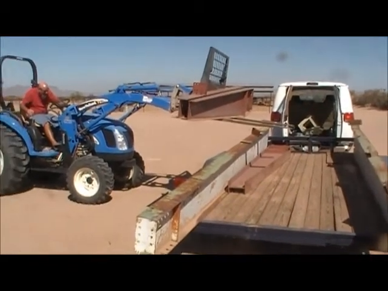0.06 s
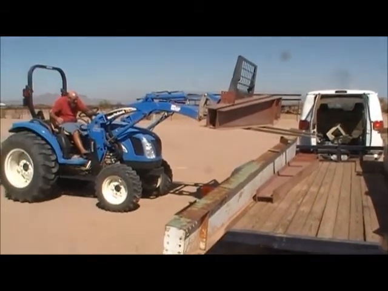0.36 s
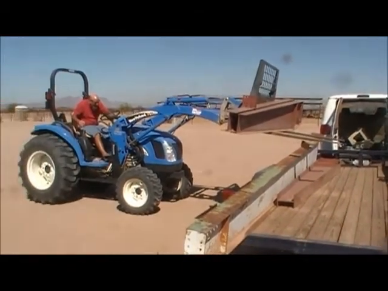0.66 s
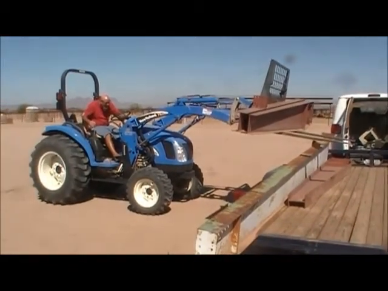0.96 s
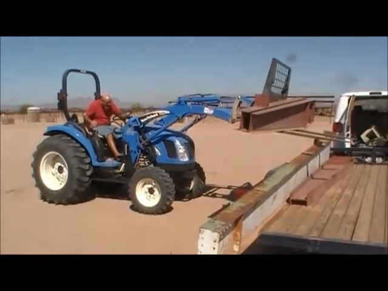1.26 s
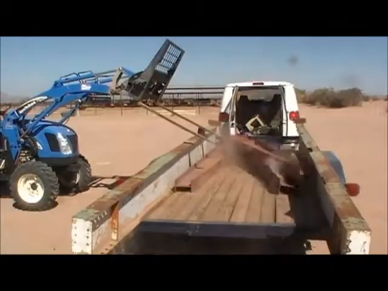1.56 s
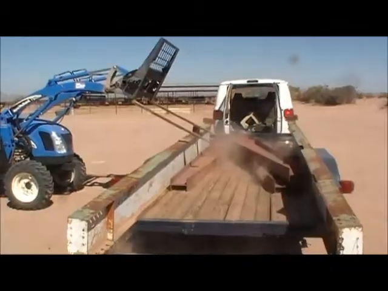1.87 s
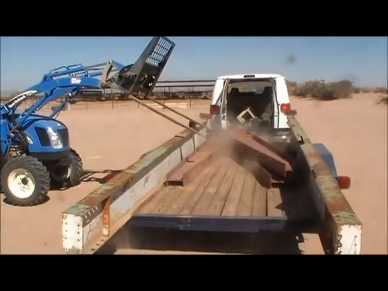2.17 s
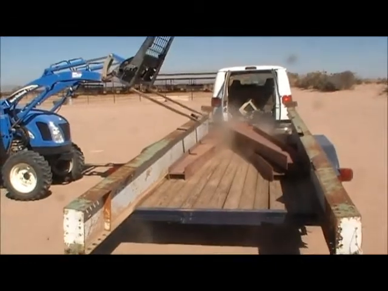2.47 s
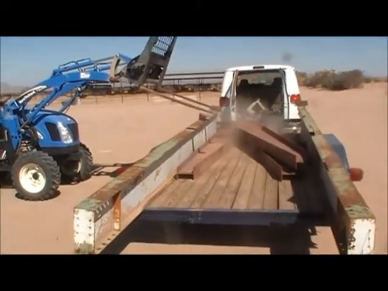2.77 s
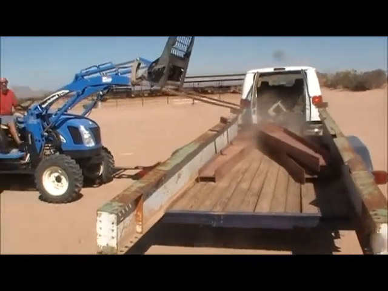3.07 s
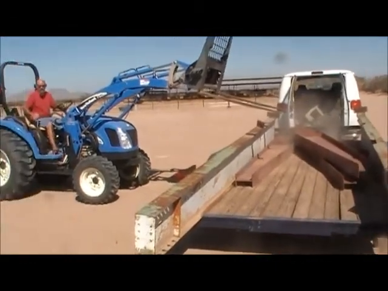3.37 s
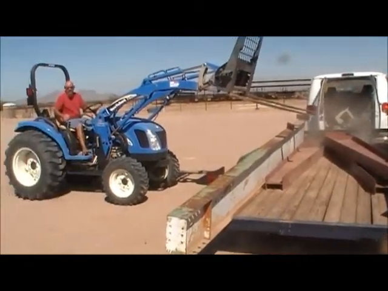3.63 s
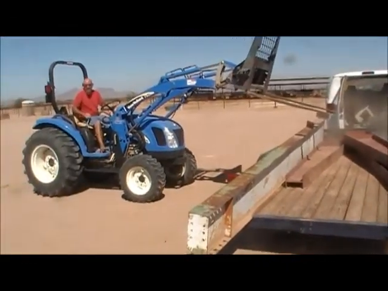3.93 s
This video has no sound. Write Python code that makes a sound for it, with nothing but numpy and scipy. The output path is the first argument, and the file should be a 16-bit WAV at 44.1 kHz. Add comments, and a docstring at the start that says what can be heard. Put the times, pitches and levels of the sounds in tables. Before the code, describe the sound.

A loud, slightly distorted crash of steel beams landing on a trailer's planks interrupts a tractor's clattering diesel idle outdoors. Bright rattles follow, the engine dips and comes back, and one sharp knock sounds. Faint wind touches the microphone early.

```python
"""Steel beams crash off a tractor's loader onto a trailer deck, heard in stereo on open ground.
Each blow rings the beams, clangs on steel and crunches on the planks; loose steel rattles after, and
the tractor gives one sharp, ringing knock. Its four-cylinder diesel idles throughout, swelling and
then falling away, puffing through the pipe and knocking block and bonnet. Light wind rumbles on the
microphone. The crash overloads the recorder, whose gain control ducks and slowly comes back."""
import sys
import numpy as np
from scipy import signal
from scipy.fft import rfft, irfft
from scipy.io import wavfile
from scipy.ndimage import uniform_filter1d

SR = 44100
rng = np.random.default_rng(int(sys.argv[2]) if len(sys.argv) > 2 else 0)


def to_wav(sig):
    """Store sig (one row per channel, or 1-D mono) as 16-bit WAV at the path in sys.argv[1].

    Samples outside -1..1 are clipped; the rate is SR.
    """
    pcm = np.clip(np.atleast_2d(sig), -1, 1) * 32767
    pcm = np.round(pcm).astype(np.int16)
    wavfile.write(sys.argv[1], SR, pcm.T)  # frames by channels


N = 176400

# Where the trailer sits in the stereo picture.
# Each row: frequency in Hz, left minus right in dB, left lead in radians, diffuse share in dB.
TRAILER_AT_MIC = [(80, -2, 0.18, 14), (400, -5, 0.19, -21), (1220, -5.5, 0.26, -11.5),
                  (2230, -2, 0.92, -7.5), (4400, -3, 0.37, -6.5), (12000, -1.2, .2, -3)]


def undb(db):
    """Decibels to gain."""
    return 10 ** (np.asarray(db) / 20)


def level(x, db):
    """Scale to an rms level."""
    return x * undb(db) / np.sqrt(np.mean(x ** 2))


def unit(x):
    """Scale each row to unit energy."""
    return x / np.sqrt(np.sum(x ** 2, axis=-1, keepdims=True) + 1e-18)


def curve(rows):
    """Join (s, value) points by straight lines."""
    return np.interp(np.arange(N) / SR, *np.array(rows).T)


def across(rows, axis=1):
    """One column of a frequency table at every spectral bin."""
    rows = np.array(rows)
    return np.interp(np.log(np.arange(N // 2 + 1) * SR / N + 1), np.log(rows[:, 0]), rows[:, axis])


def colour(x, rows):
    """Minimum-phase filter with the given (Hz, dB) response."""
    cepstrum = irfft(np.log(undb(across(rows))), N)
    cepstrum[1:N // 2] *= 2
    cepstrum[N // 2:] = 0
    taps = irfft(np.exp(rfft(cepstrum)), N)[:4096]
    return signal.fftconvolve(x, taps[None], axes=1)[:, :N]


def resonate(x, rows):
    """Sum of (Hz, width Hz, dB) resonances, alternating in sign."""
    return sum((-1) ** k * undb(db) * signal.lfilter(*signal.iirpeak(hz, hz / width, fs=SR), x)
               for k, (hz, width, db) in enumerate(rows))


def keep_energy(shaper, x, rows):
    """Filter x, scaled so that white noise would keep its energy."""
    return shaper(x, rows) / np.sqrt(np.sum(shaper(np.eye(1, N), rows) ** 2))


def fade(t60, start=0):
    """Exponential decay from a start time."""
    age = np.arange(N) / SR - start
    return (age >= 0) * np.exp(-np.log(1000) * np.maximum(age, 0) / t60)


def noise():
    """Two unrelated noises, usually for the direct and the diffuse sound."""
    return rng.standard_normal((2, N))


def play(pulses, shape):
    """Start the shape at every pulse."""
    return signal.fftconvolve(np.atleast_2d(pulses), np.atleast_2d(shape), axes=1)[:, :N]


def microphone(pair, rows):
    """Direct and diffuse sound reach the left and right ports with different level and phase."""
    direct, diffuse = rfft(pair)
    side, share = np.array([[1], [-1]]), undb(across(rows, axis=3))
    placement = undb(side * across(rows, axis=1) / 2) * np.exp(.5j * side * across(rows, axis=2))
    return irfft(placement * (direct + side * share * diffuse) / np.sqrt(1 + share ** 2), N)


def wind():
    """Light wind buffets the microphone, mostly in opposite phase at its two ports."""
    # The rumble. Each row: frequency in Hz, spectral level in dB.
    spectrum = [(20, -64), (50, -19), (90, -5), (220, 1), (300, -3.5), (450, -13), (900, -30), (16000, -75)]
    # The breeze dying down. Each row: time in seconds, level in dB.
    breeze = [(0, -24.5), (.25, -18), (.5, -25.5), (1, -29), (1.5, -34), (2.2, -41), (4, -88)]
    flutter_db = 2 * np.interp(np.arange(N), np.linspace(0, N, 60), rng.standard_normal(60))
    common, opposed = level(colour(noise(), spectrum), 0) * undb(curve(breeze) + flutter_db)
    return undb(-11) * common + np.array([opposed, -opposed])


def firings(crank, cylinder_db, lag, scatter_db):
    """One pulse per firing, each cylinder with its own strength; crank and lag count in firings."""
    count = np.arange(int(crank[-1]) + 1)
    at = np.interp(count + lag, crank, np.arange(N)).astype(int)
    pulses = np.zeros(N)
    pulses[at] = undb(cylinder_db[count % 4] + scatter_db * rng.standard_normal(len(count)))
    return pulses * (np.arange(N) > 0)


def burst(rise_s, decay_s):
    """Envelope of one firing's noise."""
    t = np.arange(SR // 12) / SR
    return (1 - np.exp(-t / rise_s)) ** 2 * np.exp(-t / decay_s)


def knock(crank, pulses, rise_s, decay_s, common_share=.15, own_share=.4):
    """A short rattle per pulse: partly common to all firings, partly each cylinder's own, partly new."""
    shape, cylinder = burst(rise_s, decay_s), np.round(crank) % 4
    grain = lambda: shape * rng.standard_normal((2, len(shape)))
    own = np.sqrt(own_share) * sum(play(pulses * (cylinder == k), grain()) for k in range(4))
    common = np.sqrt(common_share) * play(pulses, grain())
    fresh = np.sqrt(1 - common_share - own_share) * noise() * play(pulses, shape)
    return common + own + fresh


def panels(x):
    """Thin engine covers ring briefly after whatever strikes them."""
    tail = undb(-6) * unit(rng.standard_normal(N) * fade(t60=.04))
    return x + play(x, tail[:SR // 10])


def exhaust(crank, cylinder_db):
    """Every firing sends a pulse and a puff of noise through the resonant pipe."""
    # Pipe resonances. Each row: frequency in Hz, width in Hz, gain in dB.
    pipe_modes = [(144.7, 9.1, -9), (208.2, 10.5, -3.5), (242.2, 23, 0.5), (280, 45, -7.5), (377, 5.4, -4),
                  (437, 18, -6), (553.4, 36, -6.5), (598, 26.5, -6.5)]
    pulses = firings(crank, cylinder_db, lag=0.077, scatter_db=0.5)
    puffs = 0.098 * noise() * play(pulses, burst(rise_s=0.0011, decay_s=0.0047))
    return level(resonate(pulses + puffs, pipe_modes), -32)


def block(crank, cylinder_db):
    """Every firing knocks the engine block twice, the rebound softer."""
    # Block resonances. Each row: frequency in Hz, width in Hz, gain in dB.
    block_modes = [(836, 55, -4), (951, 73, -3), (1031, 67, -1.5), (1133, 94, -1.5)]
    first = firings(crank, cylinder_db, lag=-.23, scatter_db=0.9)
    rebound = undb(-6) * firings(crank, np.zeros(4), lag=0.1593, scatter_db=1.7)
    knocks = knock(crank, first + rebound, rise_s=0.0014, decay_s=0.0059)
    return level(resonate(knocks, block_modes), -26)


def bonnet(crank, cylinder_db):
    """Every firing shakes the bonnet into a midrange rattle."""
    # Bonnet resonances. Each row: frequency in Hz, width in Hz, gain in dB.
    bonnet_modes = [(1198, 114, -4.5), (1310, 77, -2), (1413, 77, -1.5), (1499, 48, 2.5), (1560, 67, 3),
                    (1665, 34, 0), (1750, 71, -4.5)]
    # The bonnet at the microphone as the tractor turns. Each row: time in seconds, gain in dB.
    facing = [(0, -1), (1.45, 1.6), (2.6, -1.5), (3.4, -1), (3.85, 3.5), (4, 1.5)]
    pulses = firings(crank, cylinder_db, lag=-.39, scatter_db=0.96)
    shakes = knock(crank, pulses, rise_s=0.003, decay_s=0.019)
    return level(resonate(shakes, bonnet_modes), -23) * undb(curve(facing))


def cylinder_slap(crank, cylinder_db):
    """A bright, ringing slap, far harder from one cylinder than from the rest."""
    # Ring of the slap. Each row: frequency in Hz, width in Hz, gain in dB.
    slap_modes = [(2250, 76, 3.5), (2690, 310, 0), (3000, 450, -4), (3365, 150, 4.5), (3900, 150, 4.5),
                  (4410, 430, -2.5)]
    # Cycles that slap harder. Each row: time in seconds, extra level in dB.
    hard_slaps = [(.15, 2), (.85, 2.5), (1.44, 2), (3.325, 3), (3.675, 2.5), (3.795, 3)]
    extra_db = sum(db * (np.abs(np.arange(N) / SR - when) < .04) for when, db in hard_slaps)
    pulses = firings(crank, cylinder_db, lag=-0.13, scatter_db=1) * undb(extra_db)
    slaps = noise() * play(pulses, burst(rise_s=.0035, decay_s=.008))
    return level(resonate(slaps, slap_modes), -31.5)


def valve_gear(crank):
    """The valve gear ticks under the covers once per firing, over a faint hiss."""
    # The ticking treble. Each row: frequency in Hz, spectral level in dB.
    spectrum = [(30, -46), (1500, -11.5), (3000, -7.5), (5400, 1.5), (6300, -4), (7300, 3), (8400, -6),
                (9800, -4), (11200, -1.5), (13000, -10), (15500, -27)]
    # Its slow dip and rise. Each row: time in seconds, gain in dB.
    drift = [(0, .5), (1.5, 0.5), (2.5, -4), (3.1, -3), (3.6, -.5), (4, 2)]
    grit = noise() * undb(0.91 * rng.standard_normal(N))
    pulses = firings(crank, np.zeros(4), lag=-0.27, scatter_db=1.9)
    ticks = grit * (0.068 + play(pulses, burst(rise_s=0.005, decay_s=0.0055)))
    return level(colour(panels(ticks), spectrum), -29) * undb(curve(drift))


def clatter(crank):
    """Broad engine noise rings the covers and pulses slightly with the firings."""
    # The clatter. Each row: frequency in Hz, spectral level in dB.
    spectrum = [(30, -22), (70, -13.5), (150, -8), (280, -5), (450, -4.5), (700, -9), (900, -1.5),
                (1550, -2.5), (2050, -5.5), (2600, -6), (3000, -8), (3500, -7), (5000, -17), (9000, -24.5),
                (16000, -38)]
    pulsing = noise() * (1 + 0.095 * np.cos(2 * np.pi * crank))
    return level(colour(panels(pulsing), spectrum), -23)


def engine():
    """The idling diesel: one crank times all its parts."""
    # The wandering idle. Each row: time in seconds, firings per second.
    speed = [(0, 34.3), (.5, 34.15), (1.55, 34.1), (1.8, 35.9), (2.1, 34.9), (2.4, 33.9), (2.75, 33),
             (3, 32.1), (3.4, 34), (3.65, 34.1), (3.8, 32.2), (4, 33)]
    # Cylinders in firing order. Each row: gain in dB for exhaust, block, bonnet and slap.
    cylinders = [(0, -2, 0, -9), (.5, 2, -1.5, .5), (0, -1.5, 1, -8), (-1.5, 1.5, 0, -12)]
    # The engine's loudness swells, then falls away. Each row: time in seconds, gain in dB.
    engine_level = [(0, -2.5), (.2, -1), (.55, -1.2), (1.45, 0.5), (2.2, 3.5), (2.6, 7), (3, 6), (3.5, 4.5),
                    (3.85, -2.5), (4, -7)]
    # Where the engine sits in the stereo picture.
    # Each row: frequency in Hz, left minus right in dB, left lead in radians, diffuse share in dB.
    engine_at_mic = [(100, -3.5, 0.9, -12.5), (437, -8.5, -1.5, -19), (825, -2, -0.15, -7.5),
                     (1370, -4, 0.61, -13), (1980, -6.5, 2, 2), (2120, 12.5, 1.45, -15),
                     (3640, 0.5, 0.32, -13), (5070, -5, 0.7, -4), (8000, 3.5, 0.77, -4.5),
                     (12000, -0.2, 0.74, -8.5)]
    crank = np.cumsum(curve(speed)) / SR
    exhaust_db, block_db, bonnet_db, slap_db = np.array(cylinders).T
    parts = (exhaust(crank, exhaust_db) + block(crank, block_db) + bonnet(crank, bonnet_db)
             + cylinder_slap(crank, slap_db) + valve_gear(crank) + clatter(crank))
    return microphone(parts, engine_at_mic) * undb(curve(engine_level))


def rattles_and_knock(hit_t60_s=0.22, squeak_s=0.015):
    """Bright rattles of loose steel, one sharp, ringing knock from the tractor and a few thin squeaks."""
    # The rattles and, at 3.316 s, the tractor's knock.
    # Each row: start in seconds, level in dB, ring relative to hiss in dB.
    hits = [(1.915, -8.5, -25), (2.027, -13.5, -2), (2.14, -16, 1), (2.266, -14, 2), (2.401, -19, 11),
            (3.316, -32, 11), (3.886, -30, -25)]
    # Their hiss. Each row: frequency in Hz, spectral level in dB.
    spectrum = [(100, -35), (1500, 2), (3500, 5), (5200, 14.5), (7000, 4), (10000, 10), (15000, -54)]
    # Their ring. Each row: frequency in Hz, width in Hz, gain in dB.
    ring_modes = [(2280, 130, 4.5), (3730, 780, -4)]
    # Faint squeaks. Each row: peak time in seconds, pitch in Hz, level in dB.
    squeaks = [(3.21, 13900, -36), (3.272, 9950, -25), (3.355, 9300, -29), (3.875, 9660, -35)]
    t, metal = np.arange(N) / SR, 0
    hiss = level(colour(noise(), spectrum), 0)
    ring = level(resonate(noise(), ring_modes), 0)
    for start, db, ring_db in hits:
        metal += undb(db) * (hiss + undb(ring_db) * ring) * fade(hit_t60_s, start)
    for when, hz, db in squeaks:
        swell = np.exp(-.5 * ((t - when) / squeak_s) ** 2)
        metal += level(resonate(noise(), [(hz, 220, 0)]), db) * swell
    return microphone(metal, TRAILER_AT_MIC)


def beam_ring():
    """The steel's answer to one tap: a dense ring and a few clear modes."""
    # The clearest beam modes. Each row: frequency in Hz, relative level in dB, t60 in seconds.
    clear_modes = [(285, -8, 1.4), (385, -9, 2.7), (402, -10, 1.6), (530, -9, 1.9), (964, -2, 1.3),
                   (1072, -1, 1.2), (1203, 3, 1.3), (1297, 2, 1.9), (1389, 0, 1.5), (1490, 0, 1.6),
                   (1745, 1, 1.1), (1825, -1, 1.2), (2213, -4, 0.7), (2513, -4, .55)]
    # The dense ring between them. Each row: frequency in Hz, spectral level in dB.
    dense_spectrum = [(30, -43), (100, -47), (200, -18), (290, -10), (400, -6.5), (560, -10), (760, -10),
                      (1020, 0.5), (1350, 2), (1700, -1), (2200, -6), (3100, -9.5), (4200, -28.5),
                      (8000, -32), (16000, -49)]
    # Its decay by band. Each row: band centre in Hz, t60 in seconds.
    band_decay = [(60, 0.32), (300, 2.18), (700, 1.78), (1300, 1.36), (2500, 0.69), (5000, 0.67),
                  (12000, 0.9)]
    t, log_hz = np.arange(N) / SR, np.log(np.arange(N // 2 + 1) * SR / N + 1)
    white, centres = rfft(noise()), np.log([hz for hz, _ in band_decay])
    bands = [irfft(white * np.interp(log_hz, centres, pick), N) for pick in np.eye(len(centres))]
    dense = sum(band * fade(t60) for band, (_, t60) in zip(bands, band_decay))
    modes = sum(undb(db) * np.sin(2 * np.pi * (hz * t + rng.random((2, 1)))) * fade(t60)
                for hz, db, t60 in clear_modes)
    return unit(colour(dense, dense_spectrum)) + undb(-5.5) * unit(modes)


def beams(clang_t60_s=0.04, crunch_t60_s=0.43):
    """Each blow is a chatter of contacts that rings the beams, clangs on steel and crunches on planks."""
    # Beams striking the deck and each other. Each row: start in seconds, relative levels of ring,
    # clang and crunch in dB, time constant of the chatter in seconds.
    blows = [(1.546, -10, -18, -16.5, 0.026), (1.574, -3, -6.5, -11, 0.086), (1.612, 3.5, -2.5, -4.5, 0.19),
             (1.655, 11, 3, -1, 0.14), (1.705, 9.5, 4, -3.5, 0.064), (1.742, 11, 6, -10, 0.076),
             (1.832, 5.5, 4.5, -7.5, 0.0033), (1.868, 3, -1, -20, 0.0027), (1.895, -2, 4.5, -26, .02),
             (1.927, 0, 5, -17, 0.016), (1.963, -6, 2, -22, 0.0035), (1.976, -2, 1, -32, 0.0016)]
    # Resonances of steel on steel. Each row: frequency in Hz, width in Hz, gain in dB.
    clang_modes = [(418, 84, -6), (1095, 216, -3.5), (1310, 126, 3.5), (1482, 136, 1), (1850, 125, -5.5),
                   (2100, 220, -11), (3200, 320, -14)]
    # The crunch of the deck planks. Each row: frequency in Hz, spectral level in dB.
    plank_spectrum = [(25, -12), (70, -24), (200, -13.5), (400, 13), (800, -0.5), (1800, 4), (3000, 3.5),
                      (5000, -1.5), (8000, -10), (12000, -15.5), (16000, -30)]
    push, clang, crunch = 0, 0, 0
    for start, ring_db, clang_db, crunch_db, chatter_s in blows:
        chatter_t60 = np.log(1000) * chatter_s
        contacts = noise()[0] * undb(5.8 * rng.standard_normal(N)) * fade(chatter_t60, start)
        push += undb(ring_db) * unit(contacts)
        clang += undb(clang_db) * unit(noise() * fade(clang_t60_s + chatter_t60, start))
        crunch += undb(crunch_db) * unit(noise() * fade(crunch_t60_s + chatter_t60, start))
    crash = (play(push, beam_ring()) + keep_energy(resonate, clang, clang_modes)
             + keep_energy(colour, crunch, plank_spectrum))
    blow_gain = np.sqrt(.1 * SR)  # unit energy becomes that of 0.1 s at 0 dB
    return microphone(crash * blow_gain, TRAILER_AT_MIC)


def scene():
    """Tractor, trailer and wind as they reach the microphone."""
    return engine() + beams() + rattles_and_knock() + wind()


def gain_control(x, limit_db=-13.5, attack_s=0.064, hold_s=0.59, release_db_per_s=19.5):
    """The recorder turns down while the sound is over the limit, waits, then comes back steadily."""
    hop = SR // 1000
    power = uniform_filter1d(np.mean(x ** 2, axis=0), size=441)[::hop]
    dt, cut_db, waited, cuts = hop / SR, 0, 0, []
    for over_db in 10 * np.log10(np.abs(power) + 1e-12) - limit_db:
        waited += dt
        if over_db > cut_db:
            cut_db += (over_db - cut_db) * dt / attack_s
            waited = 0
        elif waited > hold_s:
            cut_db = max(cut_db - release_db_per_s * dt, 0)
        cuts.append(cut_db)
    return x * undb(-np.interp(np.arange(N), hop * np.arange(len(cuts)), cuts))


def record(dry, top_hz=15600):
    """The recorder rides its gain, rounds off the overload and cuts the highest treble."""
    ducked = gain_control(dry)
    clipped = ducked / (1 + ducked ** 6) ** (1 / 6)
    return signal.sosfilt(signal.ellip(8, .2, 70, top_hz, fs=SR, output="sos"), clipped)


dry = scene()
out = record(dry)
to_wav(out)
```